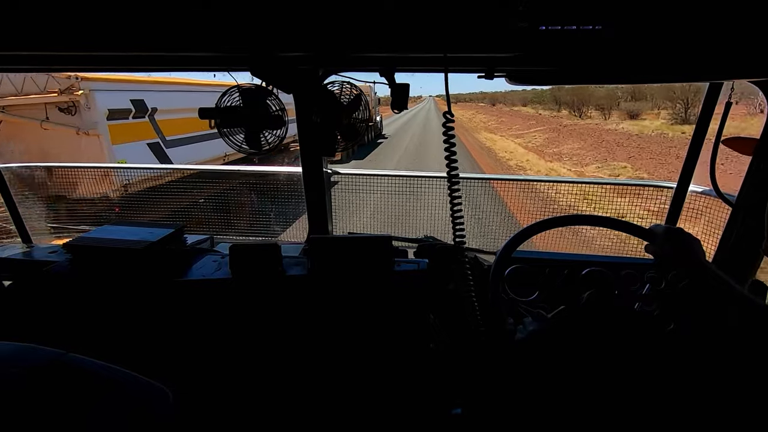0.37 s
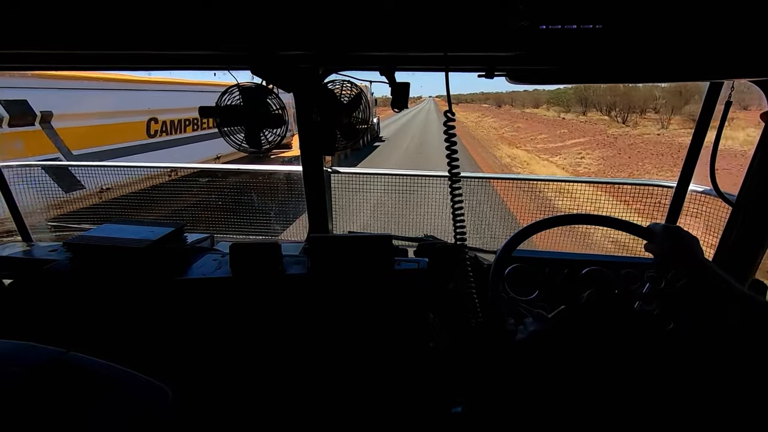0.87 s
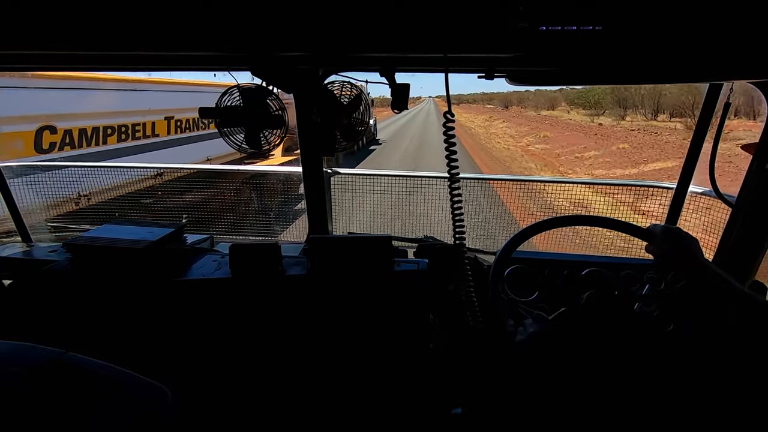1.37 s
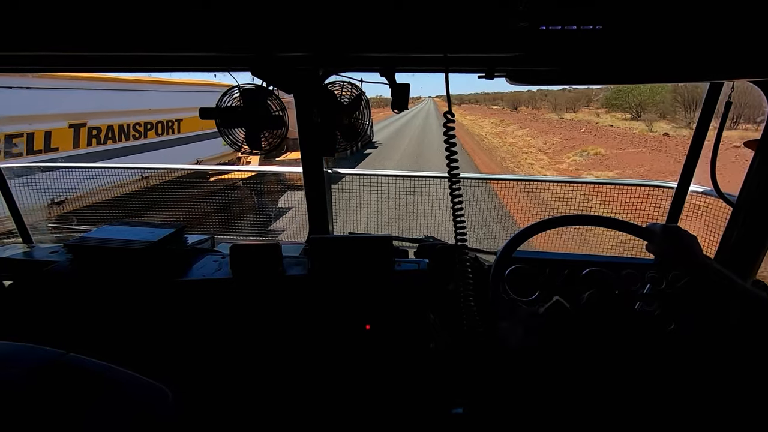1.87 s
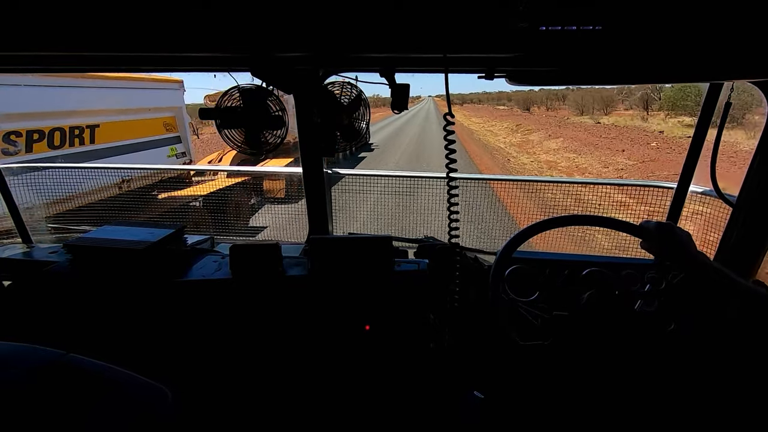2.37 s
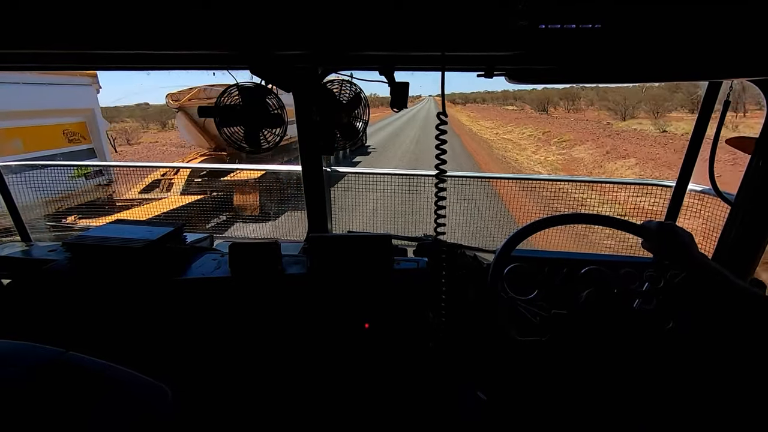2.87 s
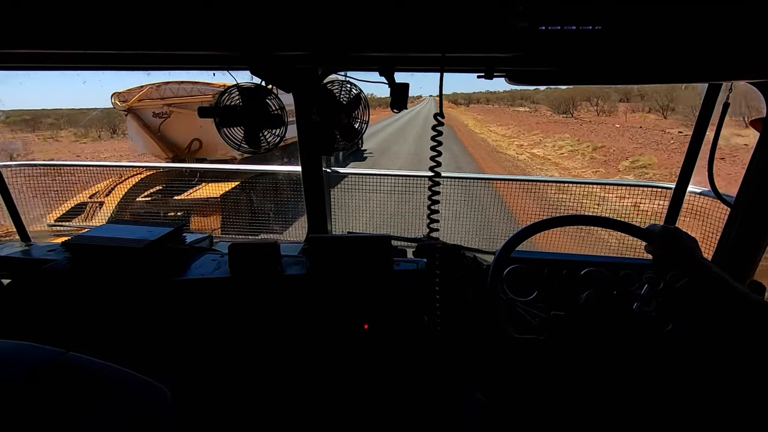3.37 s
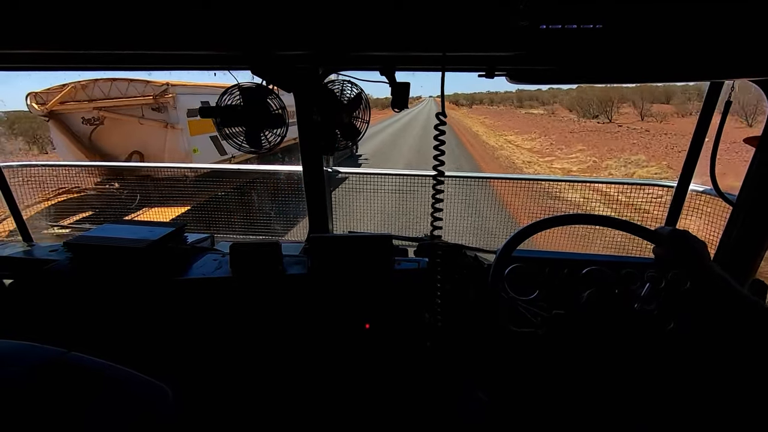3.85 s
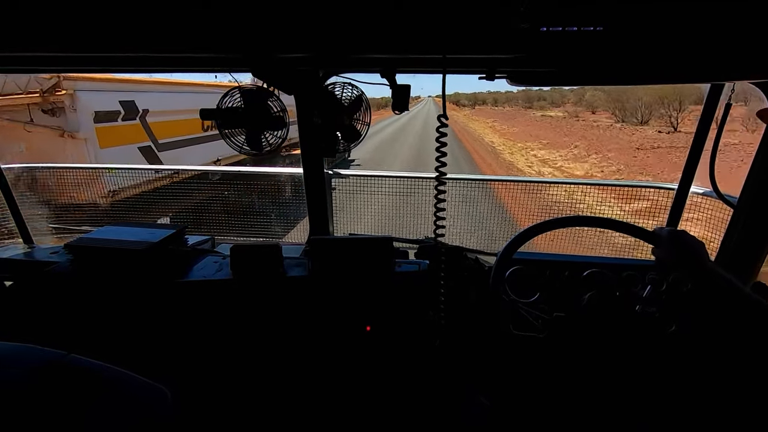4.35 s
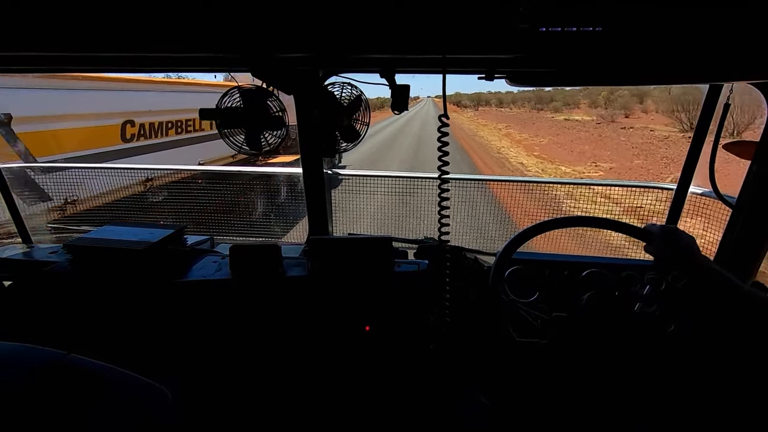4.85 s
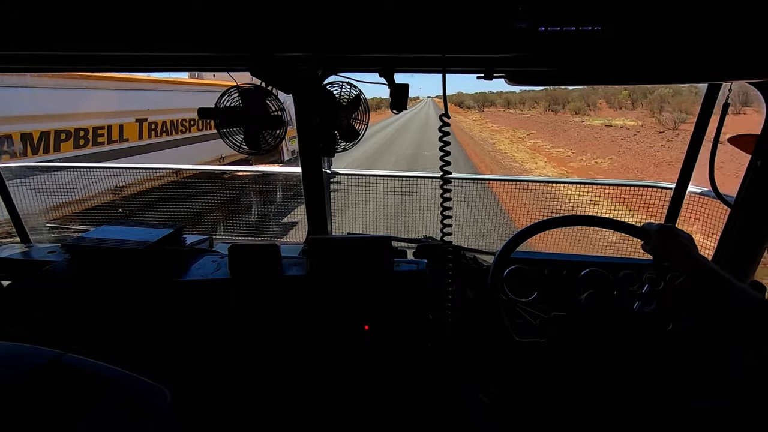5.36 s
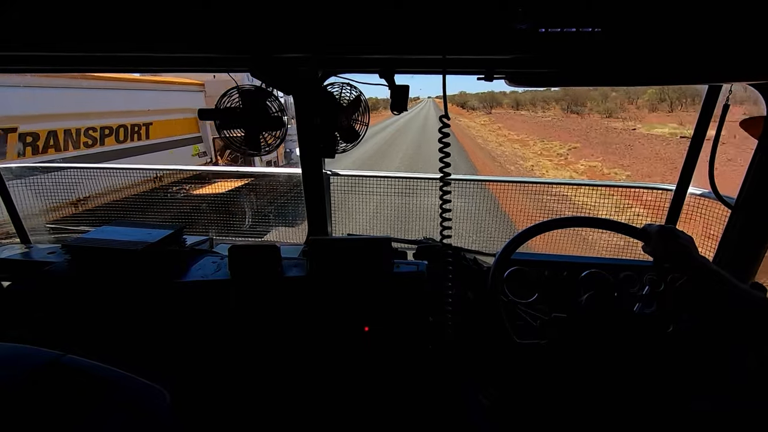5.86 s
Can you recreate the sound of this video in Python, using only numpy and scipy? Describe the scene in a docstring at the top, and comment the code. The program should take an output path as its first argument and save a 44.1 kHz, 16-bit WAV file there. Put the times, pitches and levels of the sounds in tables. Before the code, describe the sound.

Inside a heavy diesel truck cab, a deep steady engine drone climbs slowly over tyre roar and wind, with a loose metal fitting rattling.

```python
"""A deep, steady engine drone fills the cab of a heavy diesel truck gaining speed on a highway.
The drone sums sine orders locked to one rising cycle rate; a driveline tone beats against the loudest hum.
Shaped stereo noise makes the air buffeting, tyre roar and hiss, with clatter pulsing faintly in each cycle.
A loose metal fitting rattles with the engine as decaying modes and noise scrapes, among scuffs and trim ticks."""
import sys
import numpy as np
from scipy import signal
from scipy.fft import rfft, irfft, next_fast_len
from scipy.io import wavfile
from scipy.ndimage import uniform_filter1d, map_coordinates

SR = 44100
rng = np.random.default_rng(int(sys.argv[2]) if len(sys.argv) > 2 else 0)


def pcm_store(signal):
    """Save signal as 16-bit PCM."""
    levels = np.round(np.clip(np.atleast_2d(signal), -1, 1) * 32767)
    wavfile.write(sys.argv[1], SR, levels.astype(np.int16).T)


def nominal_scale(level):
    """Amplitude ratio for a level in decibels (scalar or array-like)."""
    x = np.asarray(level, float) / 20
    return 10 ** x


N = 263718
T = np.arange(N) / SR
CYCLE_HZ, GAIN_HZ_PER_S = 14.0135, .1393  # four-stroke cycle rate (half the crank speed) at first, its steady climb

# How alike road noise is on the two sides. Each row: frequency in Hz, left-right correlation.
ALIKE = [(60, .72), (92, .68), (140, .95), (210, .98), (330, .95), (500, .9), (770, .92), (1170, .99),
         (1790, .94), (2740, .9), (4400, .8), (6400, .45), (8120, .25), (15000, .1)]
# Side balance of road noise. Each row: frequency in Hz, left over right in dB.
BALANCED = [(60, 1.0), (99, 1.5), (160, 1.0), (270, 0.5), (500, 2), (790, 1.0), (1140, 0.0), (2380, 0),
            (3440, -0.5), (4970, -3), (7180, -2), (10400, 1.5), (15000, 2.0)]
# Colour of the fitting's scrapes and scuffs. Each row: frequency in Hz, gain in dB.
SCRAPE = [(2500, -30), (4500, -6), (6500, -2.5), (8300, -4), (10000, -7), (11500, -15), (15500, -25)]


def unit(x):
    """Scaled to rms 1."""
    return x / np.sqrt(np.mean(x ** 2) + 1e-20)


def along(points, hz):
    """Reads (Hz, value) points on a log frequency axis."""
    f, v = np.transpose(points)
    return np.interp(np.log(hz + 1), np.log(f + 1), v)


def wobble(rate):
    """A smooth random curve with rate knots a second."""
    return map_coordinates(rng.standard_normal(int(N * rate / SR) + 4), [T * rate])


def coloured(x, response):
    """Filters x by a response of frequency."""
    m = next_fast_len(x.shape[-1] + 8192)
    return irfft(rfft(x, m) * response(np.fft.rfftfreq(m, 1 / SR)), m)[..., :x.shape[-1]]


def cycle():
    """Engine cycle angle in radians: the integral of a steadily climbing rate."""
    return 2 * np.pi * (CYCLE_HZ * T + GAIN_HZ_PER_S * T ** 2 / 2)


def cycle_pulse(angle):
    """Rise and fall of the noise within each engine cycle, in dB before each layer's own depth."""
    return .5 * np.cos(angle - 5.5) + .4 * np.cos(2 * angle + 1.2)


def rush(spectrum, alike, balance, patchy_db):
    """Stereo noise with patches of random gain, coloured by panel resonances; its mid is rms 1 before balance."""
    # Cab resonances and notches. Each row: centre in Hz, width in Hz, gain in dB.
    panels = [(150, 15, 2), (190, 40, -1), (238, 15, 2.5), (265, 20, 3), (298, 20, 2), (348, 20, 3),
              (382, 30, -5), (408, 15, 3), (990, 70, 3.2), (1120, 50, 2.5), (1270, 60, 2), (1575, 40, 4),
              (2050, 120, 2), (2500, 250, 1.5), (2900, 120, 2), (3300, 60, 3), (3460, 100, -3),
              (3550, 60, 2.5), (3760, 50, 2), (4220, 100, -3), (4350, 120, 3), (4800, 150, 2),
              (5750, 200, 2), (6550, 200, 2), (7860, 80, 5.5), (8350, 300, 1.5)]
    left_lead = 2.3e-5  # s: road noise reaches the left first

    z = signal.stft(rng.standard_normal((2, N)), nperseg=1024)[2]
    field = uniform_filter1d(rng.standard_normal(z.shape[1:]), size=5, axis=0)
    field = uniform_filter1d(field, size=5, axis=1)
    pair = signal.istft(z * nominal_scale(patchy_db * unit(field)), nperseg=1024)[1][:, :N]

    def mid_side(hz):
        turn = np.arccos(np.clip(along(alike, hz), -1, 1)) / 2
        panel_db = sum(db / (1 + (2 * (hz - centre) / width) ** 2) for centre, width, db in panels)
        return nominal_scale(along(spectrum, hz) + panel_db) * [np.cos(turn), np.sin(turn)]

    def left_right(hz):
        gain = nominal_scale(np.outer([.5, -.5], along(balance, hz)))
        return gain * np.exp(np.outer([1j, -1j], np.pi * hz * left_lead))

    mid, side = coloured(pair, mid_side)
    return coloured(np.array([mid + side, mid - side]), left_right) / np.sqrt(np.mean(mid ** 2))


def buffeting():
    """Air buffets the cab: low noise whose level swings gently in gusts."""
    # Each row: frequency in Hz, relative density in dB per Hz.
    buffet_colour = [(4, -20), (8, -1), (16, -3), (25, 1), (36, -3.5), (50, -8), (90, -15), (250, -40),
                     (600, -120)]
    level_db = -31 + .5 * wobble(5.0)
    return nominal_scale(level_db) * rush(buffet_colour, [(20, 0.83), (100, 1.0)], [(20, 3.5), (100, 1.3)], patchy_db=3.5)


def tyre_roar(angle):
    """Tyres roar through the floor: noise that grows with speed and pulses slightly with the cycle."""
    # Each row: frequency in Hz, relative density in dB per Hz.
    roar_colour = [(30, -30), (60, 0), (100, -5), (170, 3.5), (250, -1.5), (320, -1), (400, -3.5),
                   (520, -7), (680, -11), (780, -15.5), (990, -12.5), (1300, -16.5), (1800, -21.5),
                   (2600, -27.5), (4000, -70), (8000, -120)]
    growth_db = 1.5 * GAIN_HZ_PER_S * T  # 1.5 dB per Hz of cycle rate gained
    level_db = -30.5 + growth_db + 0.82 * cycle_pulse(angle) + 0.17 * wobble(5.4)
    return nominal_scale(level_db) * rush(roar_colour, ALIKE, BALANCED, patchy_db=0.6)


def hiss_and_clatter(angle):
    """Air hiss grows with speed, and clatter swells its level within each engine cycle."""
    # Each row: frequency in Hz, relative density in dB per Hz.
    hiss_colour = [(820, -18), (1400, -5.5), (2050, -2.5), (3130, -8.5), (4500, -12), (4950, -15.5),
                   (5400, -18.5), (7000, -22), (8640, -24.3), (10000, -26), (11000, -28), (12200, -31),
                   (14000, -35.5), (14700, -38), (15600, -41.5)]
    growth_db = 1.1 * GAIN_HZ_PER_S * T  # 1.1 dB per Hz of cycle rate gained
    flicker_db = 0.31 * wobble(14) + 0.4 * wobble(2.6)
    level_db = -43.5 + growth_db + 1.3 * cycle_pulse(angle) + flicker_db
    return nominal_scale(level_db) * rush(hiss_colour, ALIKE, BALANCED, patchy_db=1.16)


def bursts(events, t60, colour):
    """Decaying noise bursts at (s, dB before colouring), through one colour."""
    layer, t = np.zeros(N + SR), np.arange(SR // 12) / SR
    for s, db in events:
        layer[round(s * SR):][:len(t)] += nominal_scale(db - 60 * t / t60) * rng.standard_normal(len(t))
    return coloured(layer[:N], lambda hz: nominal_scale(along(colour, hz)))


def trim_ticks():
    """Thin bright ticks of trim: very short bursts of treble noise."""
    # Each row: start in seconds, level in dB before colouring.
    tick_events = [(0.5681, -51), (1.1408, -54), (1.2494, -53), (1.5015, -54), (1.6107, -48), (1.9375, -52),
                   (2.0423, -53), (2.0941, -52), (2.2694, -54), (2.6184, -52), (3.2979, -53), (3.5573, -54),
                   (3.9794, -52), (4.5494, -54), (4.6598, -50)]
    # Each row: frequency in Hz, gain in dB.
    tick_colour = [(7000, -30), (10000, 1), (12500, 2), (15600, -8)]
    return bursts(tick_events, .02, tick_colour)


def scuffs():
    """Broad dull scuffs of the fitting: scrape noise without its ring."""
    # Each row: start in seconds, level in dB before colouring.
    scuff_events = [(1.2494, -43), (1.7823, -43), (2.397, -35), (2.55, -47), (2.7776, -37), (3.2994, -43),
                    (3.8694, -40), (4.225, -46), (4.6694, -40), (4.76, -41), (5.4226, -39)]
    return bursts(scuff_events, .04, SCRAPE)


def rattle(angle):
    """Each cycle knocks the fitting on both its stops, with rebounds; every tap rings its modes and scrapes."""
    # Hardest shakes, each given to the nearest engine cycle. Each row: time in seconds, strength in dB.
    hard_shakes = [(0.15, -51), (0.22, -51), (0.36, -52), (0.44, -47), (0.51, -50), (0.72, -47),
                   (1.01, -51), (1.15, -49), (1.22, -51), (1.43, -51), (1.5, -51), (1.57, -51), (1.64, -50),
                   (1.78, -49), (2.13, -51), (2.2, -51), (2.27, -49), (2.4, -48), (2.47, -47), (2.54, -51),
                   (2.62, -49), (2.76, -49), (2.9, -50), (2.96, -48), (3.03, -50), (3.1, -48), (3.24, -49),
                   (3.72, -52), (3.79, -50), (3.86, -49), (3.93, -51), (4.27, -48), (4.34, -47),
                   (4.68, -50), (5.09, -50), (5.29, -49), (5.63, -51), (5.77, -48), (5.83, -50)]
    # How hard an ordinary cycle shakes the fitting. Each row: time in seconds, strength in dB.
    usual_shake = [(0, -55), (2, -53), (3.4, -54), (5.98, -53.5)]
    # Modes of the fitting. Each row: frequency in Hz, level in dB, t60 in seconds.
    modes = [(5750, -8, .03), (7560, -7, .03), (7860, -13, .08), (8300, -9, .015), (9090, 0, .04),
             (9730, -1.5, .04), (9880, -6, .03), (9990, -2, .035), (10400, -9, .015), (13000, -21, .025),
             (13800, -20, .025), (14460, -15, .03)]
    knocks_at, faint_at = (.06, .215), (.6, .92)  # shares of the cycle: both stops, then two light touches
    shake_scatter_db, tilt_scatter_db, mode_scatter_db = 1.8, 2.5, 2.5  # by cycle, between stops, by tap
    faint_db, ring_db, scrape_db = -11, 2.3, 4

    turns = angle / (2 * np.pi)
    count = int(turns[-1]) + 1
    luck, later = rng.standard_normal((count, 4)), rng.random((count, 3, 2))
    cycles = np.arange(count)[:, None]
    knocks = np.interp(cycles + knocks_at, turns, T) + .001 * luck[:, :2]
    touches = np.interp(cycles + faint_at, turns, T)
    shake_db = np.interp(knocks[:, 0], *np.transpose(usual_shake)) + shake_scatter_db * luck[:, 2]
    for s, db in hard_shakes:
        shake_db[np.abs(knocks.mean(axis=1) - s).argmin()] = db
    tilts = tilt_scatter_db * luck[:, 3]  # favours one stop over the other

    ring, scrape = np.zeros((2, N + SR))
    t = np.arange(SR // 12) / SR
    whole = 2 * np.linalg.norm(nominal_scale(np.transpose(modes)[1]))  # rough crest of all modes together
    for (first, second), faint, db, tilt, rebounds in zip(knocks, touches, shake_db, tilts, later):
        taps = [(first, min(tilt - 1.5, 0)), (second, min(1.5 - tilt, 0))]  # (s, dB)
        taps += [(s, faint_db + tilt) for s in faint]
        taps += list(np.c_[first + .004 + .018 * rebounds[:, 0], -4 - 9 * rebounds[:, 1]])
        for s, tap_db in taps:
            at = slice(round(s * SR), round(s * SR) + len(t))
            tone = np.zeros(len(t))
            for hz, level, t60 in modes:
                mode_db = level + rng.normal(0, mode_scatter_db) - 60 * t / t60
                tone += nominal_scale(mode_db) * np.sin(2 * np.pi * hz * t)
            ring[at] += nominal_scale(db + tap_db + ring_db) * tone / whole
            scrape[at] += nominal_scale(db + tap_db + scrape_db - 60 * t / 0.065) * rng.standard_normal(len(t))
    return ring[:N] + coloured(scrape[:N], lambda hz: nominal_scale(along(SCRAPE, hz)))


def cab_echoes(x):
    """Short reflections off glass and panels: noise tails, different each side, drawn afresh on a fixed clock."""
    # Each row: frequency in Hz, t60 in seconds.
    cab_decay = [(3000, 0.045), (15000, 0.045)]
    out, step = np.zeros((2, N + SR)), SR // 7  # a new tail every seventh of a second, so none colours the modes
    for at in range(0, N, step):
        hz, t, z = signal.stft(rng.standard_normal((2, SR // 8)), SR, nperseg=256)
        fade = nominal_scale(-60 * t / along(cab_decay, hz)[:, None])
        tail = signal.istft(z * fade, SR, nperseg=256)[1]
        echo = signal.fftconvolve(x[None, at:at + step], tail / np.linalg.norm(tail[0]), axes=1)
        out[:, at:at + echo.shape[1]] += echo
    return out[:, :N]


def in_cab(taps):
    """Places the taps left of centre, louder and earlier on that side, and adds their reflections."""
    near = np.array([nominal_scale(2.5) * taps, nominal_scale(-2.5) * np.roll(taps, 9)])  # right side 9 samples later
    return near + nominal_scale(-3.5) * cab_echoes(taps)


def engine(angle):
    """Sine orders locked to the cycle; the cab spreads them in time, so the cycle is a drone, not a bang."""
    # Lesser orders. Each row: multiple of the cycle, level in dB at first, level in dB at last,
    # left over right in dB, left lead in radians.
    lesser_orders = [(3, -47, -49, 5, .2), (4, -40, -39, 4.7, -.2), (5, -40, -36, 0, .1),
                     (6, -41, -35, -2.1, -1), (7, -41, -45, 5.3, .2), (8, -39, -42, 8.9, -.4),
                     (9, -41, -46, 2, .1), (10, -41, -40, .4, .1), (11, -48, -40, 1.1, 0),
                     (12, -36.5, -38, -.6, 0), (13, -33.5, -41, .3, .3), (14, -50, -45, 3.2, .2),
                     (18, -47, -40, 1.5, .1), (19, -48, -50, 0, .2), (20, -50, -38, 0, .2),
                     (21, -48, -50, .9, .2), (22, -52, -47, .8, .1), (27, -53, -47, -1.9, 0),
                     (28, -45.5, -53, .7, 0)]
    # Level of the crank throb, the deep steady second order. Each row: time in seconds, level in dB before wavering.
    throb_level = [(0, -24.5), (.7, -29), (1.7, -25), (2.3, -27), (3.1, -28.3), (4.4, -27), (5.2, -28),
                   (5.98, -30)]
    # The sixteenth order, the loudest hum. Each row: time in seconds, level in dB before wavering.
    hum_level = [(0, -33), (1.5, -32.5), (3.1, -31.5), (3.9, -33), (5, -35.5), (5.98, -34)]
    waver_db, waver_rad = .8, .12  # slow wavering of the lesser orders' level, and of every order's phase

    throb = nominal_scale(np.interp(T, *np.transpose(throb_level)) + 0.3 * wobble(3.94))
    # a steady driveline tone, geared just below the sixteenth order, beats with the hum
    driveline = nominal_scale(-38.5) * np.exp(-1j * .0478 * (angle - 69))
    hum = nominal_scale(np.interp(T, *np.transpose(hum_level)) + 0.44 * wobble(2.95)) - driveline
    orders = [(2, throb, 3.7, 0), (16, hum, 0, .2)]  # (order, level, left over right dB, left lead rad)
    for order, first_db, last_db, pan_db, lead in lesser_orders:
        level_db = first_db + (last_db - first_db) * T / T[-1] + waver_db * wobble(3.0)
        orders.append((order, nominal_scale(level_db), pan_db, lead))

    sides = np.array([[.5], [-.5]])
    drone = np.zeros((2, N))
    for order, level, pan_db, lead in orders:
        spread = rng.uniform(0, 2 * np.pi) + waver_rad * wobble(1.5)  # its own path through the frame
        phase = order * angle + spread + sides * lead
        drone += np.real(level * nominal_scale(sides * pan_db) * np.exp(1j * phase))
    return np.sqrt(2) * drone  # order levels become rms


def scene():
    """Road noise, loose parts and engine together, on one cycle angle."""
    angle = cycle()
    road = buffeting() + tyre_roar(angle) + hiss_and_clatter(angle)
    taps = trim_ticks() + scuffs() + rattle(angle)
    return road + in_cab(taps) + engine(angle)


def band_limit(x):
    """A steep low-pass at the top of the band."""
    return signal.sosfilt(signal.butter(12, 15720, fs=SR, output="sos"), x)


def record(dry):
    """The finished mix as it is kept."""
    return band_limit(dry)


dry = scene()
out = record(dry)
pcm_store(out)
```